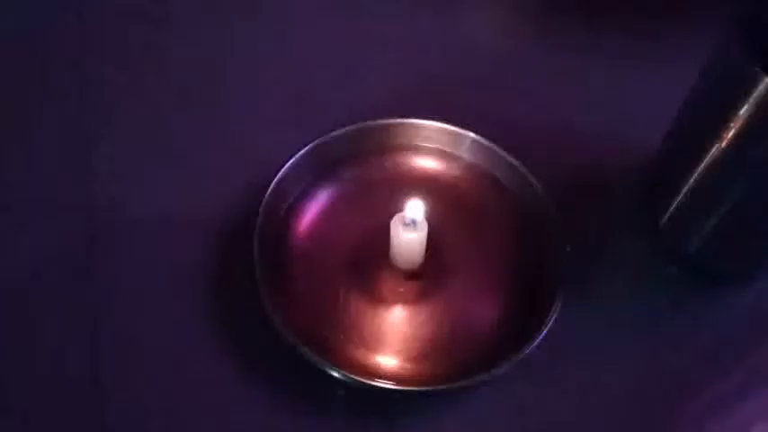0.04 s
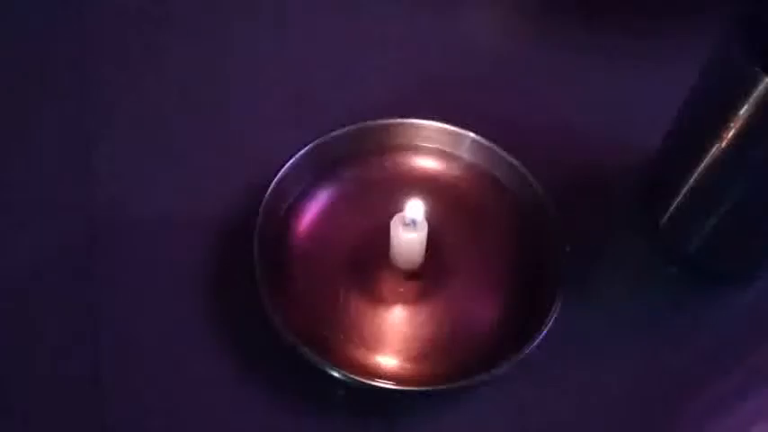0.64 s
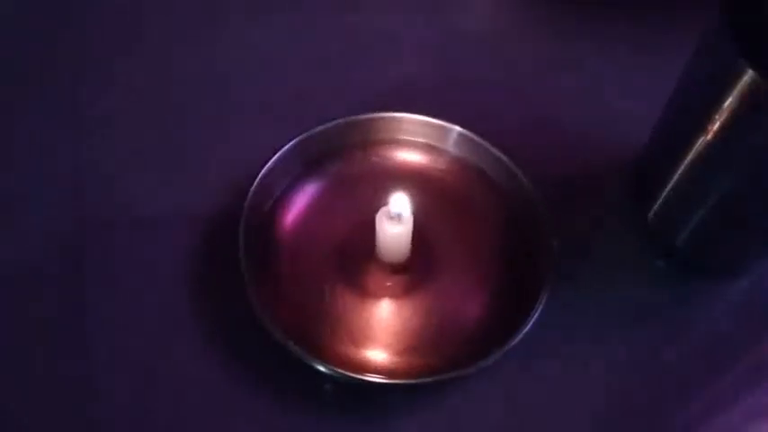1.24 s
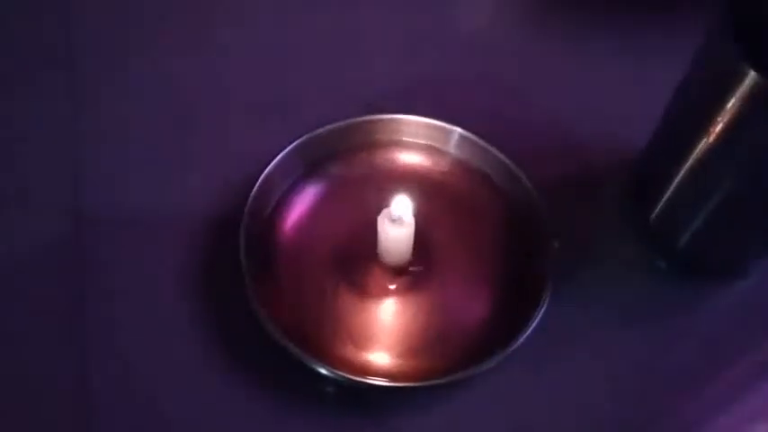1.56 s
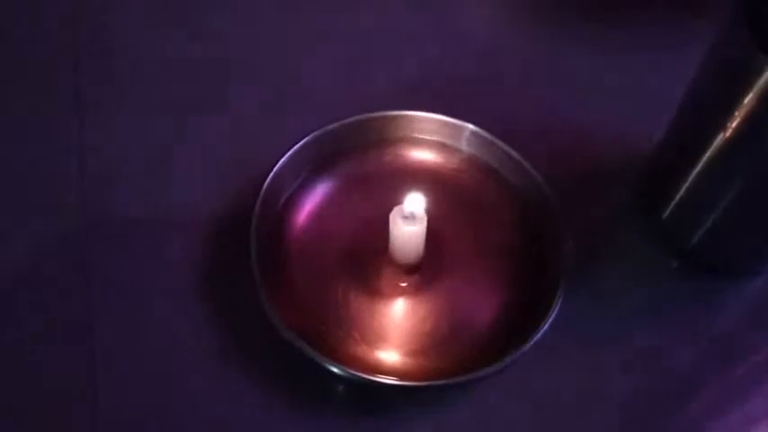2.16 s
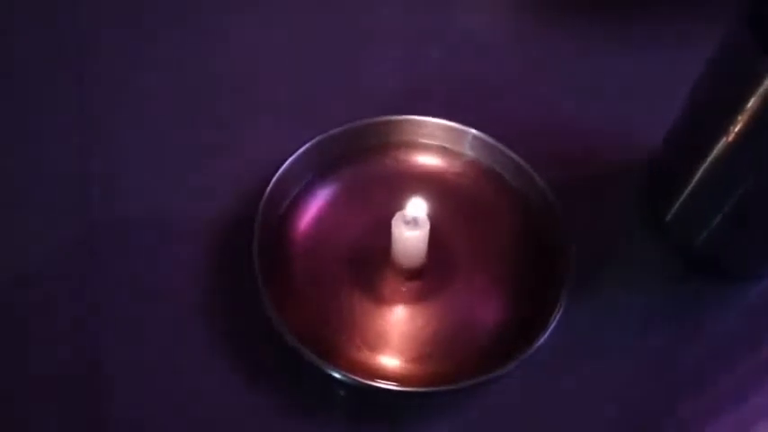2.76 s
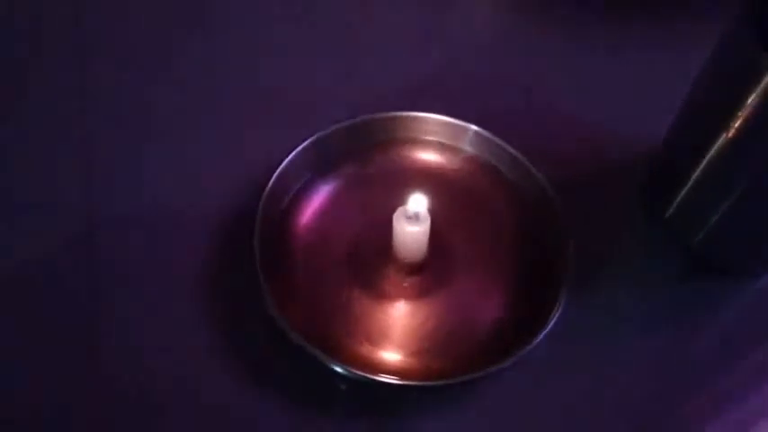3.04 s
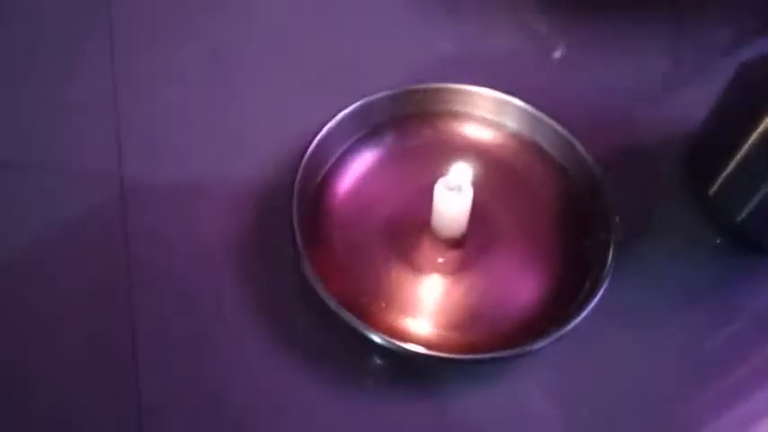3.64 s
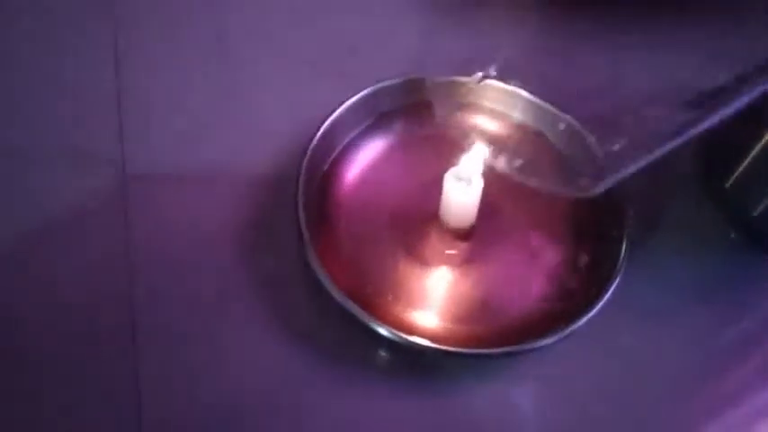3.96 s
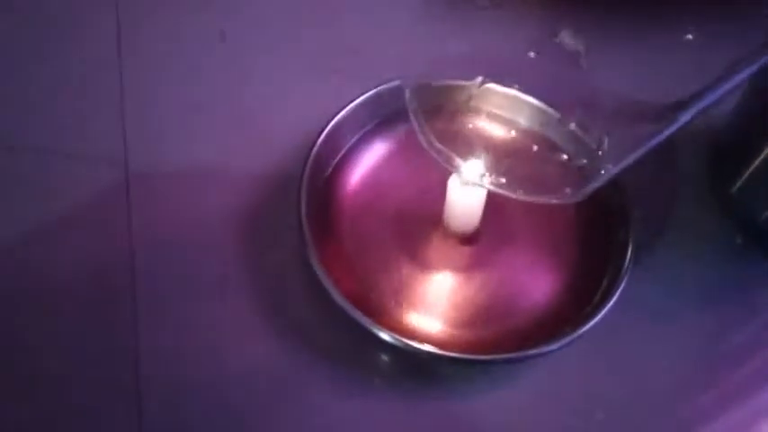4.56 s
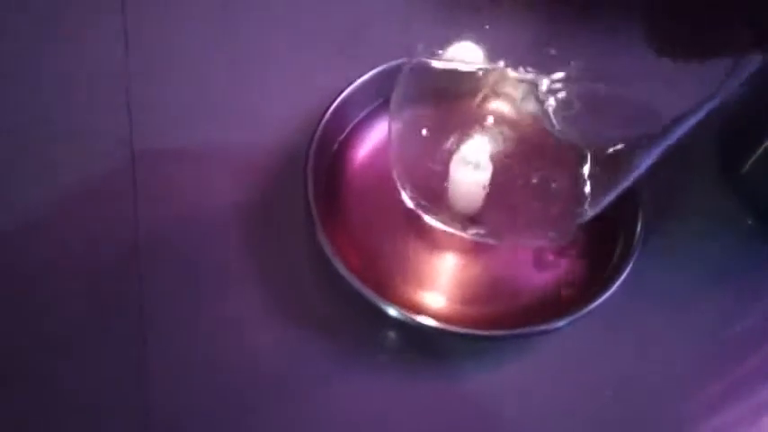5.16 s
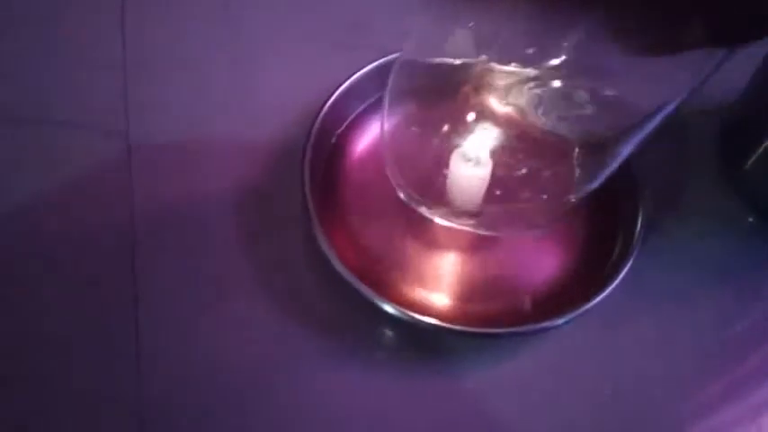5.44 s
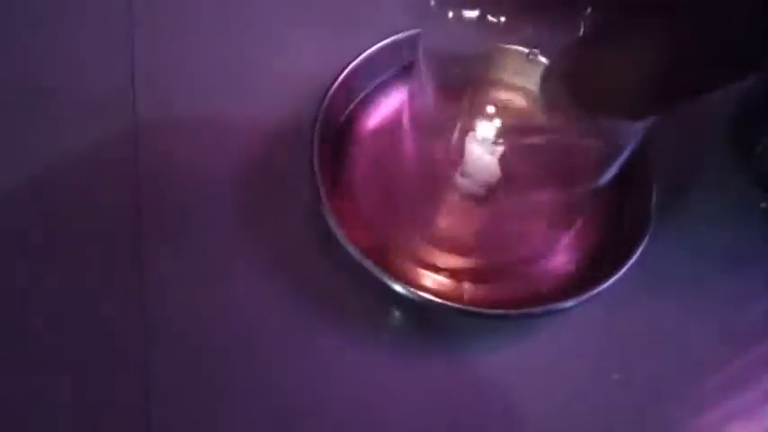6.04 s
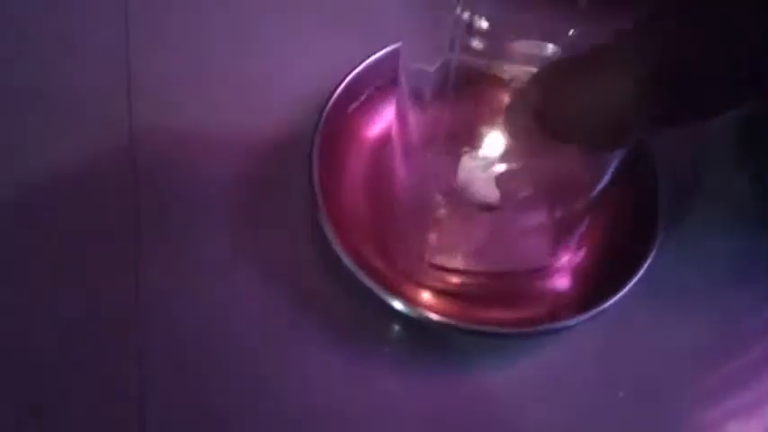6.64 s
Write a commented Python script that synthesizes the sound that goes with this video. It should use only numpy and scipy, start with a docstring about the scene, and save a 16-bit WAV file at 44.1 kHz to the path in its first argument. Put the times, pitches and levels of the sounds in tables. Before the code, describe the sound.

Sharp little snaps and sizzle from a damp candle turn hollow under a glass, which lands with a gulp and clinks on steel.

```python
"""A small room, where a candle stands in a steel plate of water. Droplets burst in its damp wick
with sharp snaps and a fizz, which turn hollow as a drinking glass is lowered over the flame.
The rim meets the water with a gulp, clinks on the plate and rattles down flat; the fizz dies.
Two thin squeaks pass, and the room hums faintly underneath.
Early on the sound drops out for a moment and fades back in."""
import sys
import numpy as np
from scipy import signal
from scipy.fft import rfft, irfft, next_fast_len
from scipy.io import wavfile
from scipy.ndimage import map_coordinates

SR = 44100
rng = np.random.default_rng(int(sys.argv[2]) if len(sys.argv) > 2 else 0)


def transcribe(signal):
    """Save signal, clipped to [-1, 1], as a 16-bit WAV file at the path in sys.argv[1]."""
    frames = np.atleast_2d(signal).T
    limited = np.clip(frames, -1, 1)
    pcm = np.round(limited * 32767).astype(np.int16)
    wavfile.write(sys.argv[1], SR, pcm)


N = 299880
TIME = np.arange(N) / SR
HIT = TIME[:SR // 2]  # time axis of a one-shot
TOP_HZ = 16900


# the clear spits of the wick: start_s, snap_db, hiss_db, pitch_hz, tock_db (against the rest)
SPITS = [(1.2188, -25.5, -28.5, 9600.0, -18), (1.5355, -28.5, -32, 9600.0, -21),
         (1.559, -43, -56, 8700.0, -20), (1.5677, -49, -41.5, 9100.0, -18),
         (1.6562, -22.5, -29.5, 9700, -34), (1.6824, -48, -51, 10400.0, -17),
         (1.7338, -42.5, -35, 8400.0, -12), (1.7415, -48, -43, 10300, -16), (1.7491, -39, -44, 9200.0, -15),
         (1.7699, -46, -48, 9100.0, -24), (1.7796, -38, -36, 8900.0, -17), (1.7843, -38, -36, 9400, -29),
         (1.787, -46, -40, 8800.0, -21), (1.851, -53, -55, 8100.0, -24), (1.8599, -45, -51, 9200.0, -7.5),
         (1.8641, -42, -53, 8300.0, -13), (1.8975, -55, -59, 9000.0, -24), (1.9257, -37.5, -36, 7900, -10),
         (1.9792, -39, -34.5, 9500.0, -16), (1.9948, -49, -50, 8700.0, -18),
         (2.0198, -39.5, -39, 9900.0, -27), (2.0853, -55, -54, 7200, -24), (2.0938, -53, -52, 9100.0, -24),
         (2.125, -59, -38, 8500.0, -6.5), (2.1306, -49, -54, 9700.0, -24), (2.1602, -34, -45, 9000.0, -14),
         (2.1853, -38, -51, 9400, -15), (2.191, -48, -45, 10800.0, -26), (2.211, -47, -46, 9600.0, -10),
         (2.2619, -36, -31.5, 8300, -13), (2.2692, -35, -47, 9100.0, -19), (2.2885, -42, -45, 9700, -21),
         (2.2963, -37, -46, 9600.0, -22), (2.3151, -37, -35, 8400.0, -20), (2.3522, -51, -38, 8400.0, -12),
         (2.3668, -49, -50, 9300.0, -24), (2.3806, -48, -51, 9200.0, -17), (2.4047, -48, -46, 8300.0, -7),
         (2.4206, -48.5, -49, 10500.0, -11), (2.453, -54, -47, 9400.0, -24),
         (2.4597, -41, -48, 9400.0, -16), (2.5035, -35.5, -34.5, 9100.0, -16),
         (2.5087, -42.5, -47, 9500, -12), (2.5825, -50, -59, 10000.0, -24), (2.5925, -38, -36.5, 9100, -15),
         (2.6275, -50, -34.5, 8600.0, -11), (2.635, -48, -51, 8400.0, -17),
         (2.6935, -52, -46.5, 8100.0, -10), (2.7511, -33.5, -34, 8600.0, -33),
         (2.7679, -40, -35.5, 9600.0, -11), (2.8176, -50, -55, 8700.0, -19),
         (2.8256, -48, -49, 10800.0, -24), (2.8964, -53, -49, 10900.0, -10),
         (2.9115, -56, -57, 9900.0, -13), (2.9318, -45, -45, 9500.0, -13),
         (2.9457, -40.5, -51, 9500.0, -16), (2.9882, -43, -44, 7600.0, -16),
         (2.9948, -40, -42, 7700.0, -10), (2.9974, -31.5, -33, 7500, -11.5), (3.026, -37, -47, 9300, -24),
         (3.0698, -54, -56, 8800.0, -18), (3.0816, -49, -52, 8200.0, -24), (3.101, -41, -41, 7700.0, -15),
         (3.1696, -41.5, -41, 8400, -11), (3.1733, -46, -47, 10500.0, -24), (3.1795, -52, -53, 9700.0, -6),
         (3.2401, -58, -39.5, 8900, -21), (3.2572, -49, -63, 9800.0, -22), (3.2663, -43, -49, 9900.0, -16),
         (3.2763, -46, -60, 8600.0, -24), (3.296, -54, -58, 8700.0, -23), (3.312, -57, -46, 8700.0, -22),
         (3.3167, -45, -52, 9600.0, -26), (3.3313, -58, -57, 9000.0, -1), (3.3468, -49, -52, 9300.0, -16),
         (3.3722, -50, -37.5, 8900.0, -13), (3.388, -46, -53, 9000.0, -24),
         (3.4168, -54, -40.5, 8100.0, -24), (3.4612, -49, -39.5, 8900.0, -12),
         (3.4841, -49, -55, 10200.0, -24), (3.503, -44, -59, 9900.0, -24), (3.5212, -44, -44, 9500.0, -9),
         (3.541, -43, -41, 9700.0, -24), (3.5706, -43, -47, 9700.0, -29), (3.59, -39.5, -37, 8000, -24),
         (3.605, -40, -46, 9500.0, -31), (3.642, -43, -40.5, 9800.0, -14), (3.6636, -51, -46, 9700.0, -12),
         (3.668, -48, -37.5, 8800, -10), (3.6915, -54, -48, 10600.0, -19), (3.696, -47, -47, 10100.0, -17),
         (3.7331, -38.5, -33.5, 8700.0, -17), (3.7795, -49, -46, 8900.0, -19),
         (3.7953, -39, -50, 9500.0, -15), (3.8869, -42, -48, 9700.0, -24),
         (3.9162, -51, -31.5, 10100.0, -32), (3.9239, -41, -36.5, 8360, -34),
         (3.957, -56, -51, 9400.0, -22), (4.0892, -42, -52, 8800.0, -24), (4.0982, -45, -36.5, 10200, -16),
         (4.1087, -32.5, -34, 10100, -14), (4.1612, -53, -45, 9800.0, -21), (4.165, -41, -47, 9500.0, -16),
         (4.2455, -48, -59, 9600.0, -24), (4.2626, -49.5, -42.5, 9300.0, -24),
         (4.2955, -41, -51, 10100.0, -12), (4.3353, -52, -44, 10000.0, -11), (4.3591, -38, -51, 8500, -20),
         (4.381, -49, -53, 10500.0, -9), (4.4527, -54, -51, 9400.0, -20), (4.46, -39, -50, 9900.0, -24),
         (4.474, -50, -41, 10200.0, -24), (4.5082, -51, -50, 9500.0, -22), (4.535, -44, -45, 10200.0, -24),
         (4.5406, -57, -44, 9700.0, -29), (4.551, -44, -43, 9600.0, -27), (4.573, -52, -54, 10200.0, -20),
         (4.61, -34.5, -38, 9800, -23), (4.618, -45, -41, 9500.0, -24), (4.7215, -47, -39, 10600, -26),
         (4.7524, -46, -42.5, 10000.0, -21), (4.824, -39, -51, 9250, -17), (4.836, -58, -60, 10400.0, -16),
         (4.873, -55, -42, 10300, -25), (4.9053, -42.5, -45, 11400.0, -21), (4.911, -48, -39, 11100.0, -24),
         (4.985, -50, -43, 12800.0, -3), (4.999, -42, -49, 11500.0, -13), (5.0673, -42, -43.5, 8450, -18),
         (5.0702, -46, -50, 10900.0, -20), (5.1252, -61, -58, 8700.0, -24),
         (5.1517, -49, -48, 10300.0, -24), (5.1597, -50, -50, 9600.0, -12),
         (5.1863, -41, -40.5, 9700.0, -14), (5.225, -43, -43, 11800.0, -16), (5.2946, -51, -38, 10300, -14),
         (5.3228, -47, -36.5, 11700.0, -11), (5.395, -46, -40.5, 10700.0, -9.5),
         (5.4261, -34.5, -34.5, 9700, -16), (5.5094, -45, -44, 8900.0, -11),
         (5.5348, -50, -43, 8000.0, -16), (5.552, -44, -40, 8140, -22), (5.5814, -50, -41, 8700, -24),
         (5.658, -50, -45, 7800.0, -18), (5.6849, -52, -38, 10400.0, -20), (5.751, -48, -37, 7240, -10),
         (5.8473, -40, -37.5, 8500, -10.5), (5.9416, -58, -46.5, 10800, -13),
         (6.388, -55, -44.5, 12400.0, -19)]
def spits():
    """Droplets burst one by one in the flame, each a sharp snap within a brief hiss."""
    snap_at_s = 0.0027  # within each one-shot
    out = np.zeros((2, N))
    for start_s, snap_db, hiss_db, pitch_hz, tock_db in SPITS:
        add(out, start_s - snap_at_s, pop(snap_db, hiss_db, pitch_hz, tock_db, snap_at_s))
    return out


def pop(snap_db, hiss_db, pitch_hz, tock_db, snap_at_s):
    """One droplet bursts: a snap, a tiny ring and a wide hiss around its pitch, over a hollow tock."""
    t = HIT[:SR // 40]
    age = np.maximum(t - snap_at_s, 0)
    low_cut = signal.butter(3, min(0.51 * pitch_hz, SR / 3), "high", fs=SR)
    high_cut = signal.butter(2, min(1.67 * pitch_hz, TOP_HZ), fs=SR)
    tock_band = signal.butter(2, [1370, 2900], "band", fs=SR)

    def decay(t60_s):
        return (age > 0) * amp(-60 * age / t60_s)

    def voiced(noise, body_db=-13.5):
        crack = signal.lfilter(*high_cut, signal.lfilter(*low_cut, noise))
        tock = burst(signal.lfilter(*tock_band, noise))
        return burst(crack + amp(body_db) * noise) + amp(tock_db) * tock

    snap = voiced(decay(t60_s=0.0013) * rng.standard_normal(len(t)))
    ring_hz = pitch_hz * np.exp(0.26 * rng.standard_normal((3, 1)))
    tiny_ring = burst(decay(t60_s=0.0015) * np.sin(2 * np.pi * ring_hz * age).sum(0))
    hiss_envelope = t ** 2 * np.exp(-t / 0.0014)
    centre, *sides = hiss_envelope * rng.standard_normal((3, len(t)))
    hiss = np.array([voiced(centre + side) for side in sides])
    return amp(snap_db) * (snap + amp(-8) * tiny_ring) + amp(hiss_db) * hiss


# how hard the damp wick sizzles: time_s, relative_level_db
SIZZLE = [(1.5, -86), (1.6, -83), (1.73, -59), (1.82, -65), (2.02, -91), (2.41, -65.5), (2.82, -70.5),
          (3.26, -69.5), (3.6, -67), (3.97, -67), (4.6, -63.5), (5.27, -62.5), (5.335, -61), (5.39, -87),
          (5.53, -67), (5.59, -55), (5.65, -63), (5.76, -62), (5.82, -88), (6.05, -80)]
def sputter(ticks_per_s=140, spread_db=7.5, hiss_db=-19, t60_s=0.0035, flutter_db=1.5):
    """Tiny bursts of uneven size over a soft hiss, in flurries as the flame flutters."""
    sizes = amp(spread_db * np.minimum(rng.standard_normal(N), 1.7))
    fires = rng.random(N) < ticks_per_s / SR
    power = signal.oaconvolve(fires * sizes ** 2, amp(-120 * HIT[:SR // 50] / t60_s))[:N]
    ticks = unit(np.sqrt(np.abs(power)) * rng.standard_normal(N))
    dying_db = 90 * np.maximum(TIME - SIZZLE[-1][0], 0)  # once the rim reaches the water
    level = (TIME > SIZZLE[0][0]) * amp(curve(SIZZLE) - dying_db + flutter_db * wobble(15))
    return level * (ticks + amp(hiss_db) * rng.standard_normal((2, N)))


def puff(start_s=1.6567, level_db=-36.5, t60_s=0.054):
    """The strongest spit also jolts the flame: a soft, low puff."""
    out = np.zeros(N)
    add(out, start_s, amp(level_db - 60 * HIT / t60_s) * rng.standard_normal(len(HIT)))
    dark_eq = [(60, -2), (150, 2), (350, 12), (600, -12), (1600, -7), (3000, -39), (8000, -58)]
    return coloured(out, dark_eq)


# tone of the open flame, left and right: freq_hz, gain_db
FLAME_EQ_LEFT = [(200, -7), (1200, -0.5), (2400, -14), (3300, -15), (4500, -0.5), (5700, -10), (7300, -4),
                 (10200, 3.5), (12700, -4), (13900, 0), (15500, -7), (16800, -32.5)]
FLAME_EQ_RIGHT = [(200, -1), (1300, -1), (2300, 3), (3200, -7), (4500, 2.5), (5500, 1), (7000, 7),
                  (8300, 7), (10400, -5), (11600, 3), (13200, -2.5), (14300, 0.5), (15500, -12),
                  (16800, -41.5)]
# how far the glass encloses the flame: time_s, share_0_to_1
COVER = [(4.4, 0), (4.9, 0.14), (5.2, 0.97), (5.5, 1), (6, 0.17)]
def wick():
    """Spits and fizz crossfade from open to hollow as the glass comes down, and wake the room."""
    fizz = amp(10) * sputter()
    left, right = spits() + fizz
    bare = amp([[-2], [-1.3]]) * np.array([coloured(left, FLAME_EQ_LEFT), coloured(right, FLAME_EQ_RIGHT)])
    covered = amp(-8) * np.array([inside_glass(left), inside_glass(right)])
    cover = curve(COVER)
    direct = np.sqrt(1 - cover) * bare + np.sqrt(cover) * covered + puff()
    direct[1] = np.roll(direct[1], -3)  # the flame is a little nearer on the right
    return direct + amp(-7.5) * reverb(direct, early_db=-3)


# hollow tone inside the glass: freq_hz, gain_db
HOLLOW_EQ = [(300, -32), (1400, -12), (1900, 7), (2700, -6), (3200, -15), (3750, 10.5), (4100, 9),
             (4450, 5), (4750, 7), (5100, 7), (5800, 2), (6400, -13), (7200, 3), (7900, 4.5), (8450, 7),
             (9450, -8), (9900, 1), (10700, 1), (11700, -5), (12300, 9), (13000, -11), (14200, 9),
             (15500, -35)]
# resonances of the enclosed air: pitch_hz, width_hz, level_db
CAVITY = [(1690, 150, -2), (3970, 140, 5), (4405, 55, 3), (5060, 90, 5), (6869, 30, -1), (6910, 35, -2),
          (7660, 50, 2), (7860, 27, -6), (7950, 33, 8), (8400, 35, 1), (9388, 23, 1), (9970, 40, -6),
          (10185, 35, 3), (10420, 60, 1), (10400, 45, 5), (11100, 45, 4), (11700, 45, 5), (12170, 40, -10),
          (12600, 35, 5), (13566, 42, -3), (14600, 50, 3)]
def inside_glass(x, t60_s=0.018):
    """Sound bounces about in the glass and rings its air; the pattern changes as the glass moves."""
    block = SR // 12
    diffuse, ringing = np.zeros((2, N))
    for start in range(round(COVER[0][0] * SR), N, block):
        part = x[start:start + block]
        bounces = amp(-60 * HIT[:block] / t60_s) * rng.standard_normal(block)
        bounces[0] += amp(-3) * np.linalg.norm(bounces)  # what comes straight through
        add(diffuse, start / SR, signal.fftconvolve(part, bounces / np.linalg.norm(bounces)))
        add(ringing, start / SR, signal.fftconvolve(part, resonances(CAVITY, scatter_db=4)))
    return coloured(diffuse, HOLLOW_EQ) + amp(3) * ringing


# the rim lands tilted, then rattles flat: start_s, thud_db, clink_db, bright_db_per_octave, slide_db
CONTACTS = [(6.098, -41, -40, 1.5, -40), (6.1013, -50, -42, -6, -57), (6.1151, -47, -38, 3, -41),
            (6.126, -44, -41, -0.5, -39), (6.132, -55, -51, -8, -45), (6.1433, -51, -52, -5, -52),
            (6.159, -45.5, -44, -5.5, -49), (6.178, -57, -44, 2, -46.5), (6.422, -48.5, -43, 13, -24),
            (6.4319, -64, -49, 8, -27), (6.438, -50, -42, -3, -32), (6.456, -55, -48, 10, -31.5),
            (6.465, -56, -53, 2, -32.5), (6.474, -64, -58, 7, -34), (6.486, -67, -54, 0, -40)]
# modes of the glass, the water-damped plate and the table under it: pitch_hz, level_db, t60_s
GLASS_MODES = [(774, -3.5, 0.23), (937, -9, .12), (1442, 5, 0.11), (1540, 6, 0.13), (1610, 7, 0.1),
               (1830, -9, 1), (2260, -6, .12), (2830, -5, 0.061), (3150, -1, 0.11), (3686, 3.5, 0.17),
               (3950, -5, .1), (4420, -6, 0.32), (5150, -12, 0.23), (6230, -6, 0.21), (6350, -5, .25),
               (7020, -2, 0.35), (7540, -12, 0.27), (7910, -15, .13), (8400, -13, .2), (9100, 2, 0.23),
               (9600, 1, 0.12), (10000, -16, 0.4), (10600, -3, 0.13), (11700, -1, 0.16), (12400, -10, .25),
               (12800, -18, 0.19), (13800, -9, 0.095), (14800, -9, 0.09)]
PLATE_MODES = [(494, 4.5, 0.15), (714, 1, 0.24), (1436, 13, 0.062), (1600, -1, 0.15), (1710, 0, 0.15),
               (1980, -3, 0.17), (2270, 1, 0.17), (2660, 0, 0.1), (3780, -5, 0.2), (4220, -2, 0.2),
               (4550, 2, 0.18), (5630, 1, 0.11), (5900, 6, 0.13), (6060, -8, .2), (6620, -4, 0.2),
               (6950, 2, 0.14), (7600, 2, .19), (8160, 0, .15), (9700, -8, 0.2), (12400, -6, 0.21)]
TABLE_MODES = [(59, -16, 0.54), (111.6, -13.5, 0.16), (234.4, -5, 0.12), (315, -7.5, 0.11), (407, 3, 0.034),
               (740, 2, 0.0094)]
def glass_on_plate(scrape_t60_s=0.06, grip_db_per_s=15):
    """Knocks ring the hand-damped glass and thud into the table; slides grate and ring the plate."""
    rings, scrapes, thuds = np.zeros((2, N)), np.zeros((2, N)), np.zeros(N)
    thud = sum(amp(db - 60 * HIT / t60) * np.sin(2 * np.pi * hz * HIT) for hz, db, t60 in TABLE_MODES)
    for start_s, thud_db, clink_db, bright_db, slide_db in CONTACTS:
        for side in rings:  # each side gets its own mix of the modes
            clink = ring(GLASS_MODES, scatter_db=6.5, detune=0.0089, bright_db=bright_db)
            add(side, start_s, amp(clink_db - grip_db_per_s * HIT) * clink)
            add(side, start_s, amp(slide_db - 11) * ring(PLATE_MODES, scatter_db=1.5, detune=0.0073))
        scrape_envelope = amp(slide_db - 60 * HIT / scrape_t60_s)
        add(scrapes, start_s, scrape_envelope * rng.standard_normal((2, len(HIT))))
        add(thuds, start_s, amp(thud_db + 6) * thud)
    direct = amp([[-1], [1]]) * (rings + grating(scrapes)) + thuds + gulps()
    return direct + amp(-7.5) * reverb(direct, early_db=-1.5)


def ring(modes, scatter_db, detune, bright_db=0):
    """One blow on a set of modes; each is a close cluster, as grip and water detune the wall."""
    hz, db, t60 = np.transpose(np.repeat(modes, 3, axis=0))[:, :, None]
    hz = hz * (1 + detune * rng.standard_normal(hz.shape))
    gain = amp(db + bright_db * np.log2(hz) + scatter_db * rng.standard_normal(hz.shape))
    gain *= rng.choice([-1, 1], hz.shape)
    partials = gain * amp(-60 * HIT / t60) * np.sin(2 * np.pi * hz * HIT)
    return partials.sum(0) / np.sqrt(np.sum(gain ** 2) / 2)


# hard scrape of rim on steel: freq_hz, gain_db
SCRAPE_EQ = [(200, -8), (700, -13), (1050, 1), (1700, 5), (2650, 6), (3100, -7), (3700, 6), (5000, 1.5),
             (5850, 7.5), (6300, -6), (6800, 7), (10000, -0.5), (14600, -5), (15500, -61)]
# clank of the steel under the sliding rim: pitch_hz, width_hz, level_db
CLANK = [(484, 30, -4), (1690, 60, 2), (1980, 36, -7), (2280, 69, -14), (3670, 49, -4), (4300, 50, -6.5),
         (4540, 46, -3), (5360, 37, -5), (5870, 73, 2.5), (6030, 45, 1), (6670, 54, 4), (6850, 53, -1),
         (7160, 49, -2), (7470, 58, -6), (7690, 45, -3), (8410, 40, 0), (9600, 97, 3.5), (11800, 53, -12),
         (13600, 70, -14)]
def grating(scrapes):
    """The rim catches and slips, taking on the plate's broad colour and its narrow clank."""
    chatter = unit(amp(6 * wobble(500)))
    sides = []
    for rub in chatter * scrapes:
        clank = signal.oaconvolve(rub, resonances(CLANK))[:N]
        sides.append(coloured(rub, SCRAPE_EQ) + amp(-3) * clank)
    return amp(-2) * np.array(sides)


# water gulps under the rim: start_s, length_s, start_hz, end_hz, level_db
GULPS = [(6.011, 0.013, 76.5, 206, -33), (6.037, 0.014, 129, 242, -41), (6.44, 0.062, 630, 746, -44.5),
         (6.468, 0.079, 778, 860, -48.5), (6.575, 0.033, 810, 910, -56)]
def gulps():
    """Short rounded tones that glide upward as the trapped air pocket shrinks."""
    out = np.zeros(N)
    for start_s, length_s, start_hz, end_hz, level_db in GULPS:
        hz = np.linspace(start_hz, end_hz, round(length_s * SR))
        add(out, start_s, amp(level_db) * np.hanning(len(hz)) * np.sin(2 * np.pi * np.cumsum(hz) / SR))
    return out


# thin squeaks: start_s, length_s, start_hz, end_hz, level_db, roughness_rad
SQUEAKS = [(3.985, .075, 5290, 5090, -61, 1.7), (6.57, .3, 9860, 9800, -69, 1.5)]
def squeaks():
    """Faint, rough high tones that swell, sag in pitch and fade."""
    out = np.zeros(N)
    for start_s, length_s, start_hz, end_hz, level_db, roughness_rad in SQUEAKS:
        progress = np.clip((TIME - start_s) / length_s, 0, 1)
        phase = 2 * np.pi * np.cumsum(start_hz + (end_hz - start_hz) * progress) / SR
        envelope = np.sin(np.pi * progress) * amp(level_db + 3 * wobble(90))
        out += envelope * np.sin(phase + roughness_rad * wobble(250))
    return out


def slow_swell(rise_s=0.018, fall_s=0.15):
    """One slow swell, below hearing, begins with the first spit."""
    age = np.maximum(TIME - SPITS[0][0], 0)
    return amp([[-20.5], [-19]]) * (1 - np.exp(-age / rise_s)) * np.exp(-(age / fall_s) ** 2)


# decay of the small room: freq_hz, t60_s
ROOM_DECAY = [(200, 0.14), (2000, 0.45), (8000, 0.25), (15000, 0.33)]
def reverb(x, early_db, first_wall_s=0.016):
    """Weak scatter from the table until the walls answer; each block gets a fresh stereo tail."""
    out, block = np.zeros((2, N)), SR // 4
    for start in range(0, N, block):
        hz, t, spectrum = signal.stft(rng.standard_normal((2, SR // 3)), SR, nperseg=256)
        decay = amp(-60 * t / along(ROOM_DECAY, hz)[:, None])
        tail = signal.istft(spectrum * decay, SR, nperseg=256)[1]
        tail *= np.where(HIT[:tail.shape[1]] < first_wall_s, amp(early_db), 1)
        tail /= np.linalg.norm(tail[0])
        add(out, start / SR, signal.fftconvolve(x[:, start:start + block], tail, axes=1))
    return out


# colour of the room tone: freq_hz, gain_db
AIR_EQ = [(20, -4.5), (40, 1.5), (57, -5), (80, -3), (150, -7), (215, -5.5), (410, -8), (560, -16.5),
          (900, -11.5), (1250, -18), (2000, -19), (3200, -24.5), (6000, -30.5), (14500, -28.5),
          (16500, -61)]
# its stereo image: freq_hz, left_right_correlation
AIR_IMAGE = [(50, 0.33), (250, 0.81), (600, 0.27), (2000, 0.016), (8000, 0.038)]
def room_tone(level_db=-53.5):
    """A bed of dark noise, closer to centre in the lows and wide in the highs."""
    def mid_side_gains(hz):
        angle = np.arccos(np.clip(along(AIR_IMAGE, hz), -1, 1)) / 2
        return amp(along(AIR_EQ, hz)) * [np.cos(angle), np.sin(angle)]

    mid, side = filtered(rng.standard_normal((2, N)), mid_side_gains)
    return amp(level_db + 0.37 * wobble(2.02)) * unit(np.array([mid + side, mid - side]))


# lines of the room's hum: pitch_hz, relative_level_db
HUM_LINES = [(57.8, -56.5), (215.3, -63.5), (301.5, -65.5), (382, -70)]
def hum():
    """Faint, unsteady tones: the upper ones waver most in pitch, the lowest also swells slowly."""
    out = np.zeros(N)
    for hz, db in HUM_LINES:
        flicker_db = 4.1 * wobble(6.4)
        swell_db = (hz == HUM_LINES[0][0]) * 1.3 * wobble(2.01)
        phase = 2 * np.pi * hz * TIME + np.sqrt(hz / 70) * wobble(10)
        out += amp(db - 3.5 + flicker_db + swell_db) * np.sqrt(2) * np.sin(phase)
    return out


def resonances(modes, scatter_db=1.0):
    """The answer of resonances to a click, at unit energy, in a fresh random mix."""
    t = HIT[:SR // 12]
    mix = amp(scatter_db * rng.standard_normal(len(modes))) * rng.choice([-1, 1], len(modes))
    answer = sum(gain * amp(db) * width * np.exp(-np.pi * width * t) * np.cos(2 * np.pi * hz * t)
                 for gain, (hz, width, db) in zip(mix, modes))
    return answer / np.linalg.norm(answer)


def coloured(x, eq, size=1024):
    """x through a minimum-phase EQ of unit energy."""
    cepstrum = irfft(np.log(amp(along(eq, np.fft.rfftfreq(size, 1 / SR)))))
    cepstrum[1:size // 2] *= 2
    cepstrum[size // 2 + 1:] = 0
    kernel = irfft(np.exp(rfft(cepstrum)))
    return signal.oaconvolve(x, kernel / np.linalg.norm(kernel))[:N]


def filtered(x, response):
    """x shaped by a gain for each frequency."""
    size = next_fast_len(N + SR // 2)
    return irfft(rfft(x, size) * response(np.fft.rfftfreq(size, 1 / SR)), size)[..., :N]


def amp(db):
    """Decibels to gain."""
    return 10 ** (np.asarray(db) / 20)


def unit(x):
    """Scale to rms 1."""
    return x / np.sqrt(np.mean(x ** 2) + 1e-20)


def burst(x, size=132):
    """Scale to the energy of size samples at rms 1."""
    return x * np.sqrt(size / (np.sum(x ** 2) + 1e-20))


def along(points, hz):
    """Read (freq_hz, value) points on a log frequency axis."""
    freqs, values = np.transpose(points)
    return np.interp(np.log(hz + 1), np.log(freqs), values)


def curve(rows):
    """(time_s, value) rows as one value per sample."""
    return np.interp(TIME, *np.transpose(rows))


def wobble(rate):
    """A smooth random curve, rate knots a second."""
    return map_coordinates(rng.standard_normal(int(N * rate / SR) + 4), [TIME * rate])


def add(track, start_s, x):
    """Mix x into track at start_s."""
    part = track[..., round(start_s * SR):][..., :x.shape[-1]]
    part += x[..., :part.shape[-1]]


def scene():
    """Candle and glass in front, the room behind."""
    return wick() + glass_on_plate() + squeaks() + slow_swell() + room_tone() + hum()


def record(dry, ceiling=0.46):
    """Hard peaks are rounded off, the sound drops out briefly and fades back, and the very top is cut."""
    rounded = dry / (1 + np.abs(dry / ceiling) ** 3) ** (1 / 3)
    mute_s, return_s, fade_in_s, floor = 0.6406, 0.92, 0.23, amp(-55.5)
    dropout = np.interp(TIME, [mute_s - 0.01, mute_s, return_s, return_s + fade_in_s], [1, floor, floor, 1])
    return filtered(rounded * dropout, lambda hz: hz < TOP_HZ)


dry = scene()
out = record(dry)
transcribe(out)
```